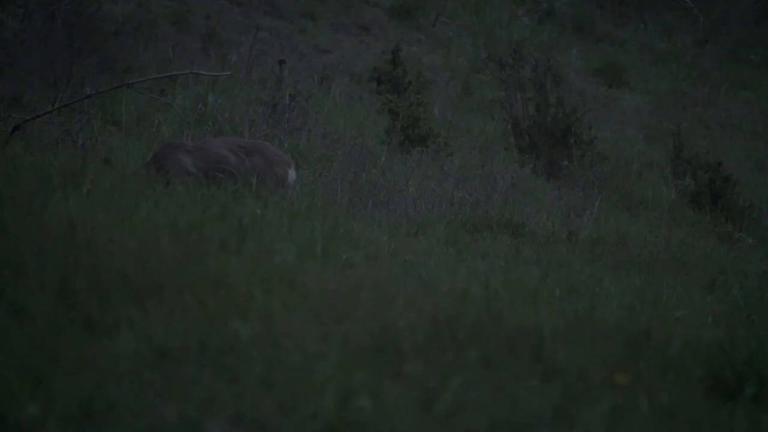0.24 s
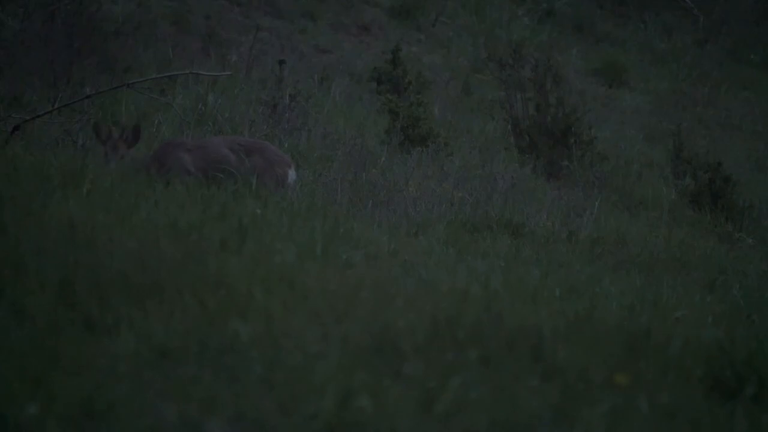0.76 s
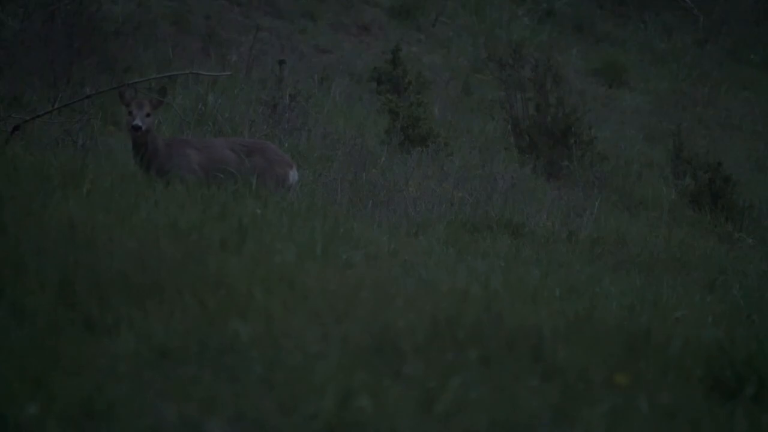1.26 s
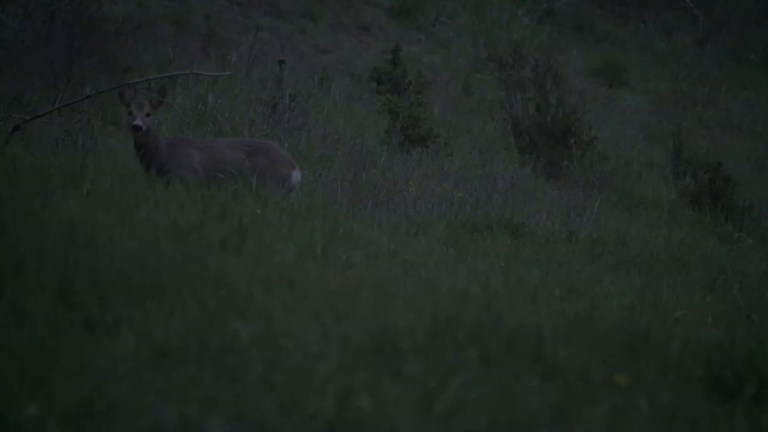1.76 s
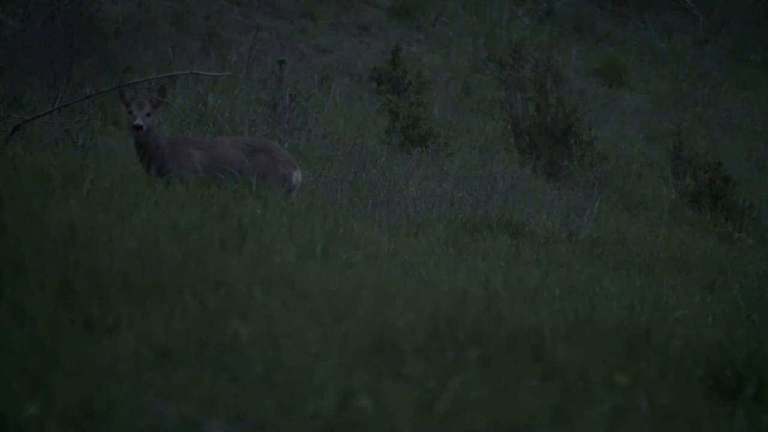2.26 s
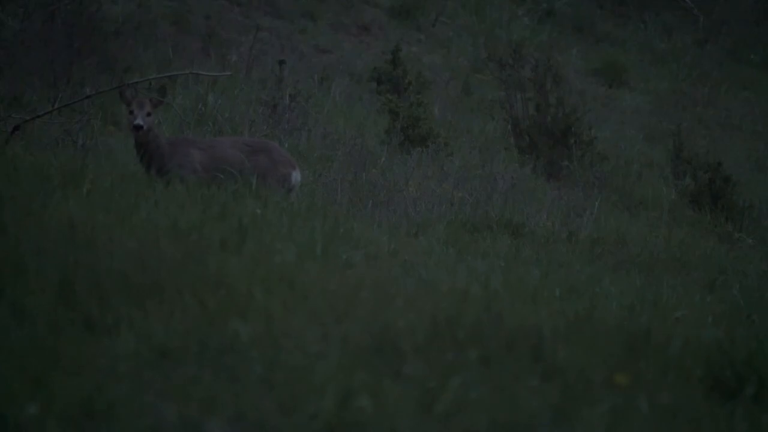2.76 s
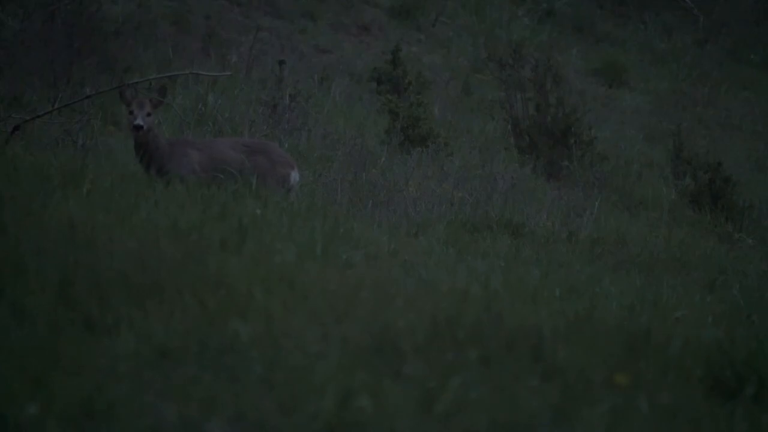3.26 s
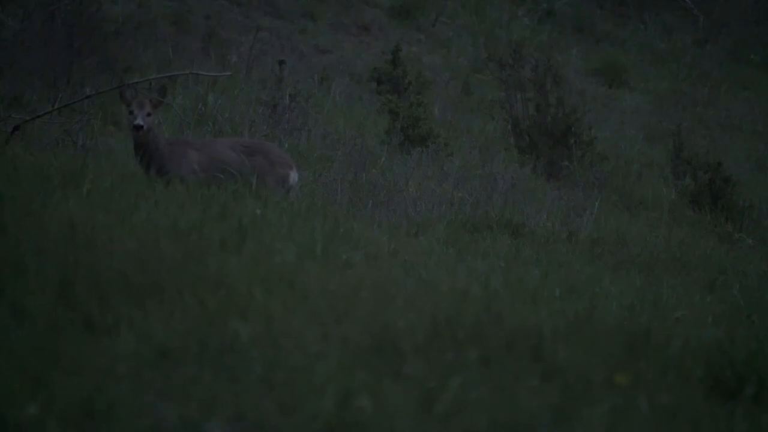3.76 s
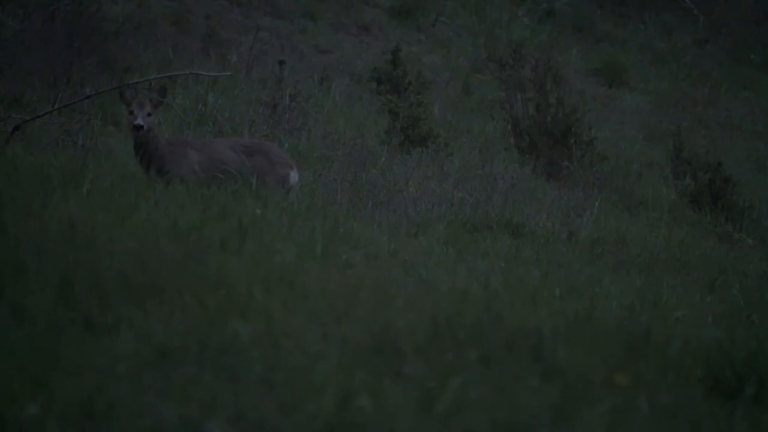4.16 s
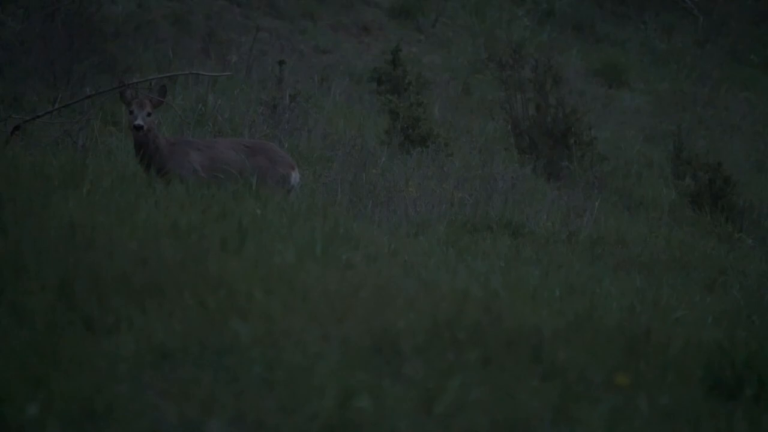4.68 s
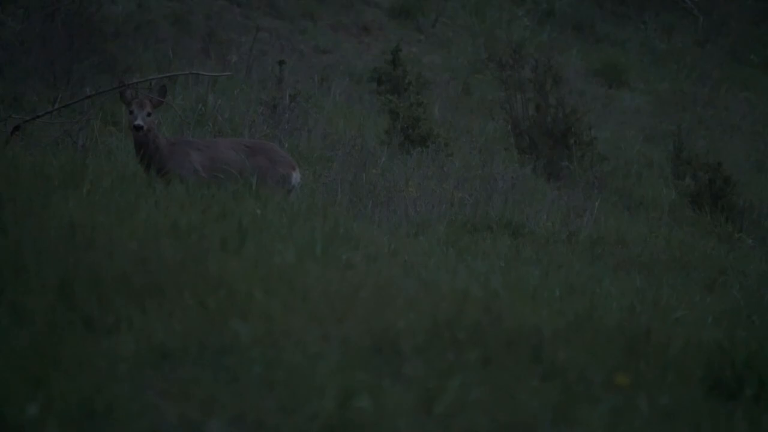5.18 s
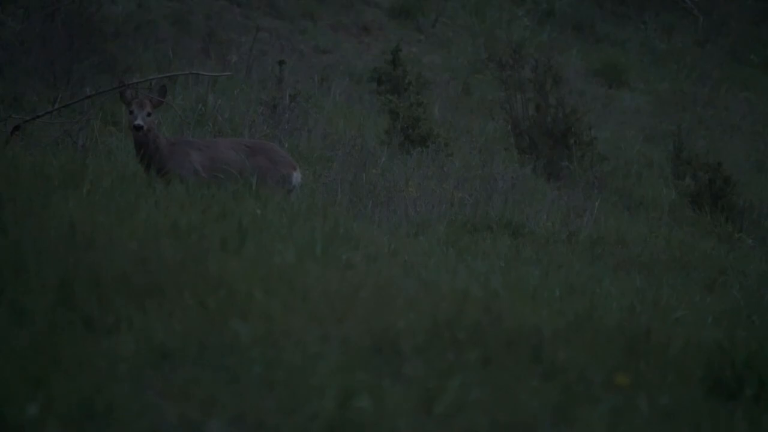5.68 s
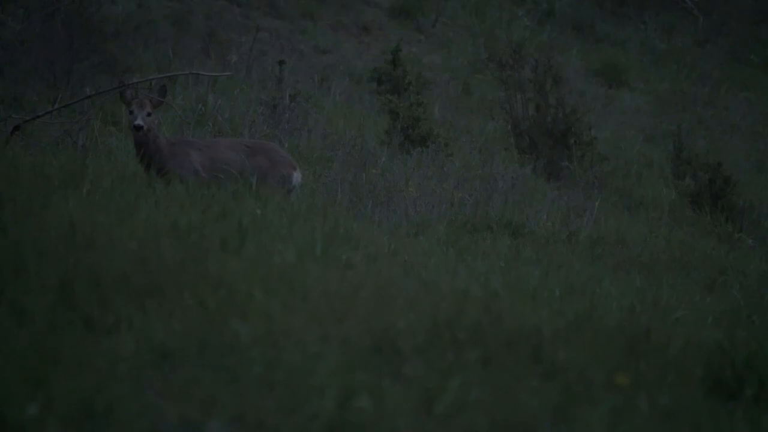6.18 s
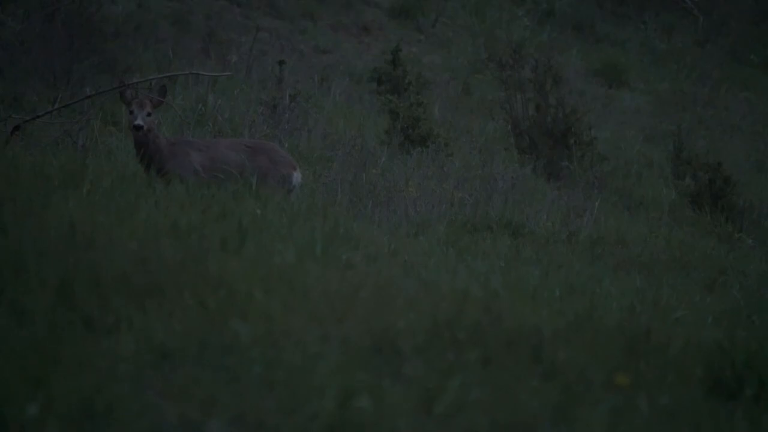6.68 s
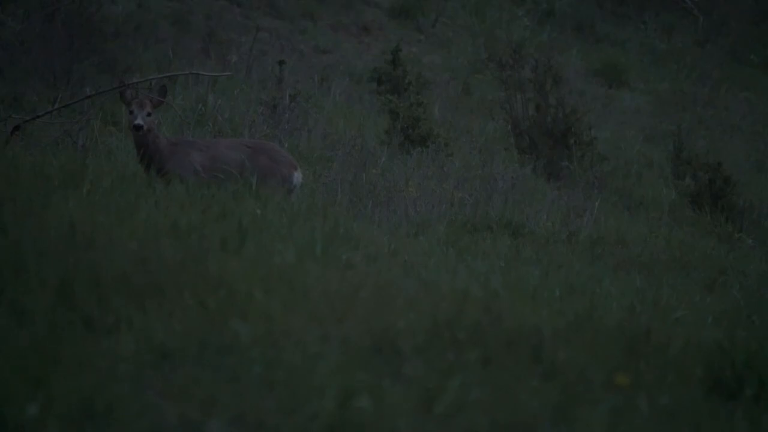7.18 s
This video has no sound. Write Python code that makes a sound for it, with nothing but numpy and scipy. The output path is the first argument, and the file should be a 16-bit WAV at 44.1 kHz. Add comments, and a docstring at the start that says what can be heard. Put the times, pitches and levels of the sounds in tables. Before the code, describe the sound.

At the edge of a quiet meadow, many songbirds overlap with thin whistles, slurs, twitters and short buzzes, softly echoed by a wooded slope. A nearer bird chips clearly at the start and end. Close to the microphone there are faint rustles, dull taps and bright ticks, then one hard click just before the middle, far louder than everything else. A distant woodpecker calls in a steady rapid series behind it.

```python
"""Dawn chorus at the edge of a meadow: near and far songbirds whistle, slur and twitter over each other,
a distant woodpecker calls, and close by something rustles and ticks, with one sharp click.
The birds are gliding, wavering tones, and the wooded slope gives them a soft echo made of random reflections.
Rustle and air are shaped noise; ticks, taps and the click are short pulses coloured by what is struck."""
import sys
import numpy as np
from scipy import signal
from scipy.fft import rfft, irfft
from scipy.io import wavfile

SR = 44100
rng = np.random.default_rng(int(sys.argv[2]) if len(sys.argv) > 2 else 0)


def log_audio(samples):
    """Write samples as a 16-bit WAV file to the path given in sys.argv[1]."""
    # one column per channel
    frames = np.atleast_2d(samples).T
    # limit to full scale, then quantise
    limited = np.clip(frames, -1, 1)
    pcm = np.round(limited * 32767).astype(np.int16)
    wavfile.write(sys.argv[1], SR, pcm)


N = 328104
TIME = np.arange(N) / SR  # seconds
# Levels in all tables are relative: gains in the functions set the final balance.


def amp(db):
    """Turns decibels into a gain."""
    return 10 ** (np.asarray(db) / 20)


def unit(x):
    """Scales a sound to an average strength (rms) of 1."""
    return x / np.sqrt(np.mean(x ** 2) + 1e-20)


def at_hz(points, hz):
    """Reads a frequency table between its rows, on a logarithmic frequency axis."""
    table_hz, value = np.transpose(points)
    return np.interp(np.log(hz + 1), np.log(table_hz), value)


def level(curve):
    """Gain at every sample from (time [s], level [dB]) rows."""
    return amp(np.interp(TIME, *np.transpose(curve)))


def add(mix, s, sound):
    """Adds a sound to the mix at time s, cutting off what runs past the end."""
    part = mix[max(round(s * SR), 0):][:len(sound)]
    part += sound[:len(part)]


def noise(colour, size=N):
    """Random hiss of rms 1, with each frequency made as strong as the table says."""
    spectrum = rfft(rng.standard_normal(size))
    gain = amp(at_hz(colour, np.fft.rfftfreq(size, 1 / SR)))
    return unit(irfft(spectrum * gain, size))


def wander(t, rate):
    """Random drift of size about 1, with a new target value `rate` times a second."""
    return np.interp(t * rate, np.arange(2000), rng.standard_normal(2000))


def woods(x, wet_db, delay):
    """Adds scatter from trunks and slope, which builds up over `delay` seconds and dies by frequency."""
    # how long the echo lasts: (frequency [Hz], time to fall by 60 dB [s])
    echo_times = [(1500, 0.69), (3500, 0.62), (6000, 0.46), (9000, 0.47), (14000, 0.38)]
    t = np.arange(SR) / SR
    hits = rng.random(SR) < 2500 / SR  # about 2500 reflections a second
    reflections = rng.standard_normal(SR) * hits * (1 - np.exp(-(t / delay) ** 2))
    hz, when, bands = signal.stft(reflections, SR, nperseg=256)
    fading = amp(-60 * when / at_hz(echo_times, hz)[:, None])
    tail = signal.istft(bands * fading, SR, nperseg=256)[1]
    echo = signal.fftconvolve(x, tail / np.linalg.norm(tail))[:N]
    return x + amp(wet_db) * echo


def glide(s, length, from_hz, to_hz, db, bend=0, swell_db=0, arch_db=0):
    """A note as (s, Hz, dB) rows. Bend above 0 moves early and levels off; below 0 it holds, then moves."""
    u = np.linspace(0, 1, num=12)  # progress through the note
    pitch = from_hz + (to_hz - from_hz) * (u + bend * u * (1 - u))
    loud = db + swell_db * (u - .5) + arch_db * (np.sin(np.pi * u) - 2 / np.pi)
    return np.transpose([s + length * u, pitch, loud])


def sing(notes, fade, flutter_db, waver_hz, tremble_hz=0, tremble_rate=200, throat=((1, 0),)):
    """A bird's voice box plays (s, Hz, dB) rows: nearly pure tones wavering in pitch and strength."""
    out = np.zeros(N)
    for note in notes:
        when, pitch, loud = np.transpose(note)
        start = when[0] - fade / 2
        t = np.arange(0, when[-1] - when[0] + fade, 1 / SR)
        hz = np.interp(start + t, when, pitch) + waver_hz * wander(t, 262)
        hz = hz + tremble_hz * np.sin(2 * np.pi * tremble_rate * t + wander(t, 60))
        db = np.interp(start + t, when, loud) + flutter_db * wander(t, 87.0)
        edges = np.sin(np.pi / 2 * np.clip(np.minimum(t, t[-1] - t) / fade, 0, 1)) ** 2
        phase = 2 * np.pi * np.cumsum(hz) / SR
        tone = sum(amp(gain_db) * np.sin(round(multiple) * phase) for multiple, gain_db in throat)
        add(out, start, np.sqrt(2) * amp(db) * edges * tone)
    return out


def snap(colour, decay, tail_db, tail_decay, grit_db=-10, size=4096):
    """One sharp pulse and a dying burst of grit, coloured by what was struck; peak 1."""
    t = np.arange(size) / SR
    fading = np.exp(-t / decay) + amp(tail_db) * np.exp(-t / tail_decay)
    burst = amp(grit_db) * rng.standard_normal(size) * fading
    burst[0] = 1
    log_gain = np.log(amp(at_hz(colour, abs(np.fft.fftfreq(size, 1 / SR)))))
    # causal filter: nothing sounds before the blow
    body = np.fft.ifft(np.exp(np.conj(signal.hilbert(log_gain)))).real
    sound = signal.fftconvolve(burst, body[:size // 2])[:size]
    return sound / abs(sound).max()


def near_singer():
    """Long notes and arched chips; at the end of each the tension lets go, so pitch and level fall."""
    # long notes, one curve each: (time [s], pitch [Hz], level [dB])
    long_notes = [
        [(1.408, 4486, -35.5), (1.418, 4550, -43), (1.428, 3720, -39), (1.432, 3666, -35.5), (1.466, 3662, -33),
         (1.471, 3700, -39)],
        [(6.54, 4120, -43), (6.548, 3945, -35.5), (6.56, 3920, -48), (6.588, 4010, -31), (6.602, 3910, -34)],
        [(6.667, 6060, -47), (6.673, 5860, -38.5), (6.697, 4680, -37), (6.709, 4574, -39), (6.721, 3690, -32),
         (6.74, 3560, -40.5)],
        [(6.826, 4090, -42), (6.834, 4100, -40), (6.868, 4130, -36), (6.884, 4055, -39.5), (6.892, 3820, -42),
         (6.91, 3670, -41.5)],
    ]
    # short chips: (start [s], length [s], top pitch [Hz], level [dB])
    chip_rows = [(0.688, 0.02, 3745, -44), (1.534, 0.022, 3820, -34.5), (1.626, 0.016, 3870, -35),
                 (1.706, 0.017, 3674, -40), (1.785, 0.019, 3620, -42.5)]
    chip_start, chip_end = .95, 0.95  # pitch at the ends of a chip, as a share of its top
    flick = (0.0065, -840, -12)  # closing down-flick: (length [s], pitch change [Hz], level change [dB])
    chips = []
    for s, length, hz, db in chip_rows:
        first = (s, chip_start * hz, db - 5)
        top = (s + length / 2, hz, db)
        last = (s + length, chip_end * hz, db)
        chips.append([first, top, last])
    notes = [[*note, np.add(note[-1], flick)] for note in list(long_notes) + chips]
    voice = sing(notes, fade=0.0042, flutter_db=1.0, waver_hz=25)
    return amp(-1.2) * woods(voice, wet_db=-7.0, delay=0.0032)


def high_singers():
    """Trembling twitters, thin clear seeps and nasal calls, whose overtones outlast no note but colour it."""
    # trembling syllables, one curve each: (time [s], pitch [Hz], level [dB])
    twitter_curves = [
        [(0.448, 7833, -57), (0.46, 8220, -41.5), (0.474, 8810, -48), (0.49, 7500, -45)],
        [(0.5, 8460, -45), (0.504, 8520, -48.5), (0.514, 8000, -52), (0.53, 7500, -45), (0.546, 6400, -42.5),
         (0.553, 5840, -48)],
        [(0.588, 8780, -54), (0.596, 8651, -44.5), (0.612, 8170, -47), (0.632, 5771, -35.5), (0.636, 5570, -47),
         (0.645, 5150, -51)],
        [(1.05, 7520, -48), (1.058, 7500, -49.5), (1.084, 7840, -40.5), (1.092, 8250, -35), (1.11, 8575, -48),
         (1.142, 8424, -37.5), (1.15, 8200, -43)],
        [(1.16, 8147, -44), (1.17, 7850, -42), (1.198, 8100, -47), (1.21, 8584, -34.5), (1.222, 8590, -45.5),
         (1.3, 8620, -49.5), (1.336, 7900, -49.5)],
    ]
    # thin, clear notes, one curve each: (time [s], pitch [Hz], level [dB])
    seep_curves = [
        [(6.19, 7640, -60), (6.198, 7430, -52), (6.214, 7530, -48), (6.252, 8070, -50.5), (6.26, 7600, -47)],
        [(6.29, 8500, -55), (6.3, 8280, -51.5), (6.384, 8660, -46.5), (6.392, 8366, -50), (6.402, 8670, -50),
         (6.424, 8420, -51), (6.458, 8850, -56), (6.47, 8540, -56)],
    ]
    # nasal notes: (start [s], length [s], from [Hz], to [Hz], level [dB])
    nasal_rows = [(5.971, 0.067, 1381, 1403, -49.5), (6.055, 0.065, 1351, 1330, -44.5)]
    # overtones that sound in place of the nasal base pitch: (multiple of the pitch, level [dB])
    overtones = [(3, -9.5), (4, -11.5), (5, 3.5), (6, -12.5), (7, -29), (8, -29), (9, -32), (10, -36)]
    twitter = sing(twitter_curves, fade=0.00198, flutter_db=4.5, waver_hz=91, tremble_hz=132,
                   tremble_rate=180)
    seep = sing(seep_curves, fade=0.0024, flutter_db=0.0, waver_hz=50)
    nasal = sing([glide(*row) for row in nasal_rows], fade=0.011, flutter_db=1.5, waver_hz=11,
                 throat=overtones)
    out = amp(-1.5) * woods(twitter, wet_db=-8.5, delay=0.0091)
    out += amp(1.5) * woods(seep, wet_db=-10, delay=0.015)
    return out + amp(-1.5) * woods(nasal, wet_db=-8.0, delay=0.01)


def slurs():
    """Birds in the middle distance slide between pitches, each kind of note with its own shape."""
    # one bird's steep slur, always the same shape: (start [s], level [dB])
    steep_slurs = [(2.603, -48.5), (3.477, -46.5), (3.748, -60), (3.938, -58), (4.124, -52), (4.387, -47.5)]
    # calls of two like falling notes: (start [s], gap to second note's start [s], level [dB])
    double_calls = [(1.975, 0.097, -54), (4.235, .097, -53.5), (7.081, .092, -53.5)]
    # soft notes that dip and level off: (start [s], length [s], level [dB])
    sighs = [(0.705, 0.0345, -61), (0.808, 0.052, -62), (1.46, .12, -66), (1.75, 0.15, -67),
             (4.205, .055, -63), (6.287, 0.065, -50), (6.607, .09, -64.5), (6.759, .05, -59),
             (6.866, 0.077, -61.5)]
    # notes that nearly hold their pitch, then droop: (start [s], length [s], end pitch [Hz], level [dB])
    droops = [(2.027, 0.13, 6260, -64.5), (2.247, 0.13, 5450, -67), (2.712, 0.088, 5790, -52.5),
              (2.768, 0.11, 6170, -60), (2.959, .12, 6460, -56.5), (3.649, 0.13, 6420, -58),
              (3.843, 0.14, 6440, -57.5)]
    # falling slurs: (start [s], length [s], from [Hz], to [Hz], level [dB])
    falls = [(0.085, 0.064, 3760, 3140, -57.5), (0.567, 0.057, 3500, 3100, -60.5),
             (1.022, .044, 3440, 3130, -61), (1.133, 0.01, 6710, 5280, -54),
             (1.762, .16, 8060, 7100, -66.5), (2.05, 0.077, 6330, 5120, -60),
             (2.21, 0.046, 6900, 5650, -60), (2.256, .14, 5740, 5250, -57), (2.48, .07, 6840, 5170, -60),
             (3.045, 0.11, 4260, 3990, -51), (4.657, 0.073, 5730, 4620, -51),
             (5.27, 0.037, 3860, 3280, -61), (5.327, .062, 3640, 1810, -57), (5.385, 0.15, 8070, 6980, -59),
             (5.553, 0.054, 3670, 1880, -55), (5.649, 0.017, 5500, 3600, -54.5),
             (5.572, 0.022, 6730, 4570, -64), (5.666, 0.097, 6150, 5250, -61),
             (5.94, .076, 6560, 5040, -59), (6.145, .027, 3000, 1920, -62), (6.54, .05, 8040, 6850, -69),
             (6.812, 0.046, 8900, 7250, -68), (6.996, 0.079, 3090, 2870, -60.5),
             (7.145, 0.051, 2950, 2370, -65)]
    # rising slurs: (start [s], length [s], from [Hz], to [Hz], level [dB])
    rises = [(1.085, 0.035, 5450, 7600, -55), (2.424, .055, 4400, 5100, -52.5),
             (2.583, 0.072, 4190, 4980, -56), (5.422, 0.048, 4700, 5700, -77),
             (5.467, .064, 2950, 3550, -54.5), (5.744, .058, 1880, 2420, -59.5),
             (5.799, 0.031, 2360, 4550, -56), (5.828, 0.05, 4530, 5620, -64),
             (5.869, .069, 2540, 3630, -59), (6.247, .1, 2280, 3260, -65),
             (6.294, 0.084, 2980, 3700, -56.5), (6.655, 0.078, 2400, 3650, -63)]
    notes = [glide(s, .056, 6500, 4150, db, bend=0.164, swell_db=-1.0, arch_db=2) for s, db in steep_slurs]
    for s, gap, db in double_calls:
        notes += [glide(s + lag, .054, 5570, 4710, db, bend=0.21, swell_db=3.5) for lag in (0, gap)]
    notes += [glide(s, length, 6950, 6430, db, bend=1.2, swell_db=8) for s, length, db in sighs]
    notes += [glide(s, length, 6870, hz, db, bend=-1.7, swell_db=2.5) for s, length, hz, db in droops]
    notes += [glide(*row, bend=.45, swell_db=-1.5, arch_db=-0.5) for row in falls]
    notes += [glide(*row, bend=0.256, swell_db=-1.5) for row in rises]
    return woods(sing(notes, fade=0.0064, flutter_db=3.0, waver_hz=22), wet_db=-6, delay=0.0097)


def pips(count=6):
    """Tiny notes that rise quickly in pitch, some scattered and some in an even run."""
    # scattered pips: (start [s], starting pitch [Hz], level [dB])
    scattered = [(2.484, 4030, -54.5), (2.705, 4310, -57), (2.78, 4530, -55.5), (4.09, 4000, -59),
                 (4.278, 4100, -56), (4.463, 4150, -57), (4.568, 4030, -57), (4.625, 5250, -57),
                 (5.255, 4150, -72), (6.246, 5280, -56.5)]
    length_s, rise = 0.0227, 1.12  # rise: end pitch as a multiple of the starting pitch
    run_s, step_s, run_hz, run_db = 6.055, .07, 4420, -56.5
    run = [(run_s + k * step_s, run_hz, run_db) for k in range(count)]
    notes = [glide(s, length_s, hz, rise * hz, db) for s, hz, db in list(scattered) + run]
    return amp(1.0) * woods(sing(notes, fade=.007, flutter_db=0.5, waver_hz=22), wet_db=-4.5, delay=0.0077)


def trill(count=7):
    """One bird repeats the same quick falling chirp at even steps."""
    start_s, step_s, chirp_s = 4.754, .066, 0.026
    from_hz, to_hz, db = 3700, 2850, -52.5
    notes = [glide(start_s + k * step_s, chirp_s, from_hz, to_hz, db) for k in range(count)]
    return woods(sing(notes, fade=.006, flutter_db=1.2, waver_hz=15), wet_db=-6, delay=.025)


def buzzes():
    """A very fast, uneven warble spreads each note into a buzzing band."""
    # buzzy notes: (start [s], length [s], pitch [Hz], warble depth [Hz], level [dB])
    buzz_rows = [(0.55, 0.051, 5440, 200, -48.5), (0.584, 0.076, 4815, 196, -53),
                 (0.697, 0.187, 4350, 117, -58.5), (2.805, 0.25, 6130, 490, -58.5),
                 (3.199, 0.054, 4230, 238, -48), (3.362, 0.048, 4260, 288, -48.5),
                 (3.531, 0.056, 4210, 300, -49.5), (3.713, 0.047, 4185, 290, -48.5),
                 (3.886, 0.27, 7220, 200, -58.5), (3.939, 0.23, 6650, 346, -58.5),
                 (4.493, 0.25, 7230, 304, -64.5), (4.67, 0.053, 5350, 497, -51.5)]
    out = np.zeros(N)
    for s, length, hz, depth_hz, db in buzz_rows:
        note = glide(s, length, hz, hz, db)
        out += sing([note], fade=.015, flutter_db=1.0, waver_hz=0.35 * depth_hz, tremble_hz=depth_hz,
                    tremble_rate=110)
    return woods(out, wet_db=-2.0, delay=0.026)


def far_singers():
    """Nearly level whistles and a call of two overlapping tones; much of both arrives as echo."""
    # long notes from the trees: (start [s], length [s], from [Hz], to [Hz], level [dB])
    whistle_rows = [(0.0, 0.014, 4440, 4470, -53), (0.104, 0.25, 3397, 3493, -69),
                    (0.032, 0.16, 7110, 7250, -53.5), (0.204, 0.044, 7400, 7320, -54.5),
                    (0.291, 0.35, 5805, 5900, -55.5), (0.346, 0.1, 4220, 4500, -55),
                    (0.685, 0.17, 4510, 4240, -58.5), (0.856, 0.16, 4345, 4146, -56.5),
                    (0.986, 0.07, 2880, 2897, -63.5), (1.27, 0.045, 4130, 4450, -58),
                    (2.2, 0.035, 4340, 4290, -56.5), (2.844, 0.21, 4270, 4220, -67),
                    (3.277, 0.066, 3390, 3280, -55.5), (3.437, 0.057, 3284, 3285, -54.5),
                    (3.553, 0.16, 2930, 2920, -65), (3.588, 0.059, 3220, 3225, -50.5),
                    (3.766, 0.098, 7200, 7230, -63), (3.785, 0.034, 3270, 3230, -51),
                    (4.129, 0.23, 7160, 7250, -57.5), (4.183, 0.12, 2870, 2900, -59),
                    (4.257, 0.15, 3025, 3200, -62), (4.41, 0.3, 5856, 5825, -56.5),
                    (4.781, 0.314, 4350, 4277, -57.5), (4.862, .097, 2900, 2875, -56.5),
                    (5.095, 0.31, 4330, 4210, -59.5), (5.516, 0.12, 3655, 3620, -60.5),
                    (5.946, 0.13, 3560, 3660, -61), (6.16, 0.067, 6650, 6710, -63),
                    (6.361, 0.1, 3595, 3590, -63.5), (6.95, 0.075, 4154, 4110, -62),
                    (6.967, 0.19, 2660, 2424, -67.5), (7.297, 0.032, 4470, 4450, -58.5),
                    (7.387, 0.074, 4770, 4720, -62), (7.388, 0.054, 4290, 4290, -61)]
    # two-tone calls: (start [s], length [s], level [dB])
    two_tones = [(1.207, 0.236, -58.5), (1.932, 0.247, -58.5)]
    upper_hz, lower_hz = 2893, 2395
    lag_s, share, lower_db = .03, 0.76, -4  # the lower tone is later, shorter and softer
    notes = [glide(*row, bend=0.613, swell_db=-5, arch_db=1) for row in whistle_rows]
    whistles = woods(sing(notes, fade=.02, flutter_db=2.3, waver_hz=45.2), wet_db=-2.5, delay=0.01)
    pair = []
    for s, length, db in two_tones:
        # the upper tone dips in the middle, the lower one fades
        pair.append(glide(s, length, upper_hz, upper_hz, db, arch_db=-6.5))
        pair.append(glide(s + lag_s, share * length, lower_hz, lower_hz, db + lower_db, swell_db=-14, arch_db=1))
    calls = woods(sing(pair, fade=.018, flutter_db=3.5, waver_hz=31), wet_db=1.5, delay=.04)
    return amp(2.0) * whistles + amp(-2.0) * calls


def woodpecker(rate=6.1, low_hz=1100, top_hz=1990, fall_hz=300):
    """Steadily repeated notes sweep up, ring at the top and sag; they arrive mostly as echo."""
    # the long call: (time [s], level [dB])
    call_level = [(2.2, -65), (2.23, -66), (3.05, -59.5), (4.92, -58.5), (5.31, -68), (5.8, -72)]
    u = (TIME * rate + 0.0793 * wander(TIME, 2)) % 1  # progress through each note
    climb = np.sin(np.pi / 2 * np.minimum(u / .6, 1)) ** 1.5
    sag = np.clip((u - .6) / .3, 0, 1) ** 2
    hz = low_hz + (top_hz - low_hz) * climb - fall_hz * sag
    edges = np.sin(np.pi * np.minimum(u / 0.93, 1)).clip(0) ** 0.078
    strength = amp((hz - top_hz) / 70) * edges  # 1 dB softer for every 70 Hz below the top
    hz = hz + 35 * wander(TIME, 250) + 25 * wander(TIME, 12)
    voice = strength * np.sin(2 * np.pi * np.cumsum(hz) / SR)
    to_nearest_end = np.minimum(TIME - call_level[0][0], call_level[-1][0] - TIME)
    calling = np.clip(to_nearest_end / 0.12, 0, 1)
    return amp(1.0) * calling * level(call_level) * unit(woods(voice, wet_db=1.0, delay=0.032))


def handling():
    """Close rustle of swelling noise, with bright ticks and dull taps made of short struck pulses."""
    # swells of rustling: (time of peak [s], half-length [s], level [dB])
    swell_rows = [(.46, .16, -75), (1.35, 0.25, -63.5), (1.94, 0.12, -66.5), (2.64, 0.12, -72),
                  (3.403, 0.34, -74), (3.72, 0.087, -89), (4.443, 0.16, -65.5)]
    # colour of the rustle: (frequency [Hz], level [dB])
    rustle_colour = [(90, -0.5), (250, 5), (600, 9.5), (2000, 2), (6000, 7.5), (10000, 4.5), (13000, -4),
                     (16000, -14)]
    # bright ticks: (time [s], level [dB])
    tick_rows = [(0.3814, -53), (1.1772, -57), (1.752, -48.5), (1.927, -52), (2.0557, -45), (2.0793, -43.5),
                 (2.113, -46.5), (2.2017, -50), (2.7192, -55), (2.7797, -56), (3.2103, -53)]
    # colour of the ticks: (frequency [Hz], level [dB])
    tick_colour = [(200, -24.5), (1500, 2), (4000, -1.5), (9000, 4.5), (13000, 2), (16000, -8.5)]
    # dull taps: (time [s], level [dB])
    tap_rows = [(0.164, -48), (0.384, -48), (0.703, -49.5), (0.959, -48.5), (1.121, -52), (1.36, -45),
                (1.431, -51), (2.004, -47), (3.505, -52), (6.27, -49.5)]
    # colour of the taps: (frequency [Hz], level [dB])
    tap_colour = [(80, -43), (350, 13), (1200, 5.5), (2500, -27), (6000, 0.5), (15000, -22.5)]
    swells = amp(-79)  # the rustle never quite stops
    for s, half, db in swell_rows:
        swells = swells + amp(db) / (1 + ((TIME - s) / half) ** 4)
    out = amp(5) * swells * noise(rustle_colour) * amp(2.5 * wander(TIME, 240))
    # ticks and taps start slightly after their listed times
    for s, db in tick_rows:
        tick = snap(tick_colour, decay=0.00041, tail_db=-18.5, tail_decay=0.012)
        add(out, s + 0.0007, amp(db + 14.5) * tick)
    for s, db in tap_rows:
        tap = snap(tap_colour, decay=.005, tail_db=-14, tail_decay=.012, grit_db=-3)
        add(out, s + .003, amp(db + 4) * tap)
    return out


def click():
    """A hard click rings the casing briefly, rebounds twice and scatters back from the grass."""
    # the click and its two small rebounds: (time [s], level [dB])
    blows = [(3.2855, -1), (3.305, -32), (3.3213, -28)]
    # ringing tones of the casing: (frequency [Hz], level [dB], time to fall by 60 dB [s])
    casing = [(113, -47, 0.14), (219, -43, 0.055), (325, -37.5, .05), (440, -28.5, 0.035),
              (543, -35, 0.063), (1820, -34, 0.014), (3200, -73, 0.042), (6420, -38, 0.095)]
    # colour of the click: (frequency [Hz], level [dB])
    click_colour = [(60, -7), (130, -3), (300, 0.5), (470, 5), (600, 3), (720, -1), (1100, -2), (2000, -19),
                    (3500, -5.5), (7000, -7), (11000, -4), (12500, -19), (16000, -27.5)]
    out = np.zeros(N)
    t = np.arange(8192) / SR
    ring = sum(amp(db - 60 * t / t60) * np.sin(2 * np.pi * hz * t) for hz, db, t60 in casing)
    crack = amp(-8) * snap(click_colour, decay=.001, tail_db=-16, tail_decay=.005, grit_db=-8, size=len(t))
    scatter = amp(-45.5) * noise(click_colour, len(t)) * np.exp(-t / 0.059)
    for s, db in blows:
        add(out, s, amp(db) * (crack + ring + scatter))
    # weaken the rumble below 70 Hz
    return signal.sosfilt(signal.butter(2, 70, "high", fs=SR, output="sos"), out)


def far_chorus(count=420):
    """Hundreds of faint chirps with random times and pitches melt into one shimmer."""
    # loudness of the distant chorus: (time [s], level [dB])
    chorus_level = [(0, -60), (1.0, -59), (1.8, -54), (3.6, -54), (4.3, -48), (5.2, -47), (6.3, -50),
                    (7.4, -58)]
    notes = []
    for when, span, pitch, slope, loud in rng.random((count, 5)):
        hz = 2800 * 2.1 ** pitch
        end_hz = hz * (1 + .5 * (slope - .55))
        notes.append(glide(when * N / SR, 0.023 + .05 * span, hz, end_hz, -14 * loud, bend=0.35))
    chirps = woods(sing(notes, fade=.008, flutter_db=2, waver_hz=35), wet_db=.5, delay=.02)
    return amp(-9.0) * level(chorus_level) * unit(chirps)


def morning_air():
    """Still air as soft shaped noise whose level drifts slightly."""
    # colour of the air: (frequency [Hz], level per Hz [dB])
    air_colour = [(15, -38), (25, -0.5), (66, 3.5), (229, -6), (911, -6.5), (1560, -12), (2410, -8.5),
                  (3340, -8.5), (3920, -14), (4870, -9.5), (6050, -14), (6560, -13), (9320, -27),
                  (14800, -29.5), (16000, -26)]
    return amp(-59) * noise(air_colour) * amp(.5 * wander(TIME, 2.94))


def microphone_difference(mid):
    """What the two microphones do not share: faint noise, and a little of the sound's rate of change."""
    # colour of the unshared noise: (frequency [Hz], level per Hz [dB])
    unshared_colour = [(12, -30), (20, -5.5), (788, -9), (1980, -12), (3350, -11), (4430, -11),
                       (5380, -9.5), (14300, -15.5), (15500, -19.5)]
    return amp(-72.5) * noise(unshared_colour) + amp(-34) * np.gradient(mid)


def scene():
    """Birds and handling over still morning air; the two close microphones hear almost the same."""
    birds = near_singer() + high_singers() + slurs() + pips() + trill() + buzzes()
    birds += far_singers() + woodpecker() + far_chorus()
    mid = birds + handling() + click() + morning_air()
    side = microphone_difference(mid)
    return np.array([mid + side, mid - side])


def record(dry):
    """The recorder's band limit: a low-pass filter takes away the sound above about 15750 Hz."""
    low_pass = signal.firwin(255, 15750, window=("kaiser", 8), fs=SR)
    return signal.oaconvolve(dry, low_pass[None], "same")


dry = scene()
out = record(dry)
log_audio(out)
```